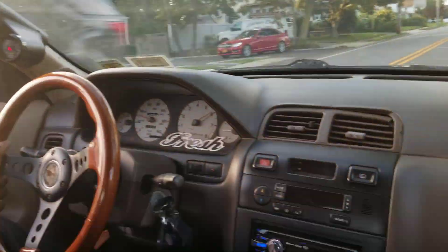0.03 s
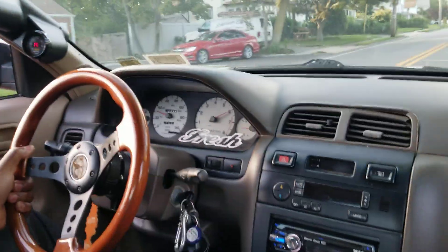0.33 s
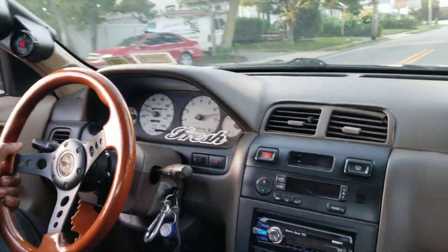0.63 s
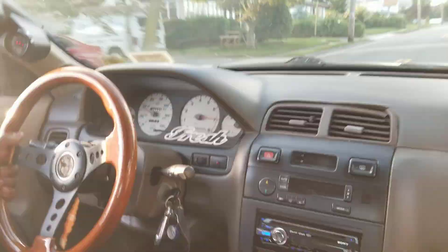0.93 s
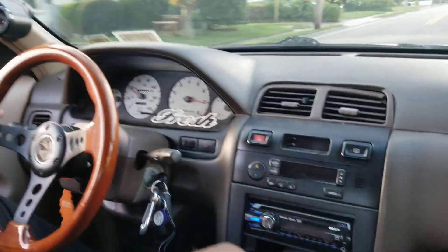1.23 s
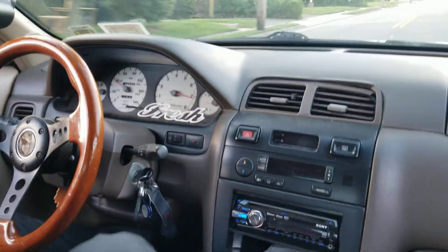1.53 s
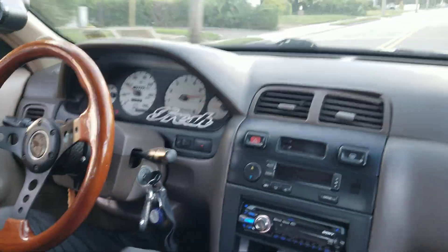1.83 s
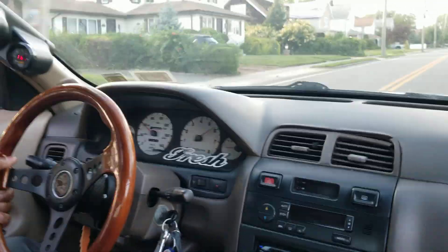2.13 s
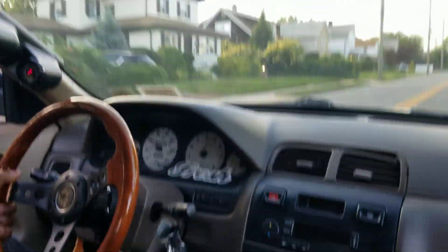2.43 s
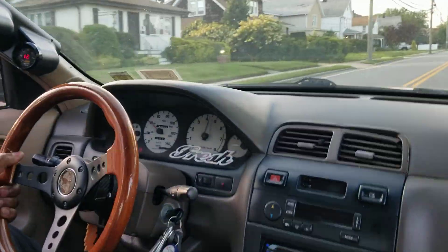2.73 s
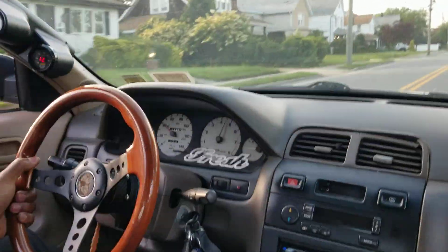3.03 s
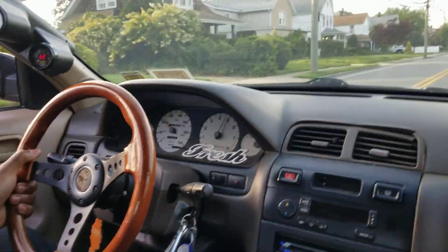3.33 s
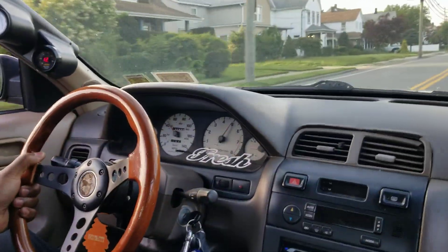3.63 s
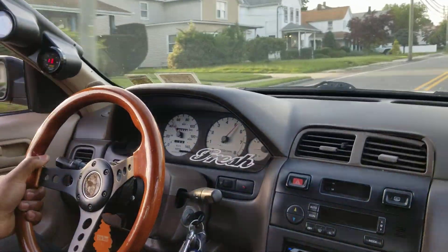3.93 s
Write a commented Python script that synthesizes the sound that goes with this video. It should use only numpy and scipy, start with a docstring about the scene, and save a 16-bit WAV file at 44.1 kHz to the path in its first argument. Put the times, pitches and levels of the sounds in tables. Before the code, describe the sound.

A car engine, heard from inside the cabin, pulls hard with a rough rumble, thumps and a loud hiss. From about 0.9 to 1.4 seconds it stutters through misfires and pops. The hiss fades and the revs sink for a gear change around 2 seconds. A lower, smoother drone then climbs slowly over road noise, joined from about 3.5 seconds by a faint, high, rising turbo whistle.

```python
"""Inside a turbocharged six-cylinder car.

The engine pulls hard and unevenly under a loud hiss of gas, stumbles in a run of misfires, and sinks
as the throttle closes. After a gear change it drones smoothly upward over road noise while the turbo
begins to whistle. Periodic firing gives the note; irregular pulses ring the exhaust and the cabin."""
import sys
import numpy as np
from scipy import signal
from scipy.fft import rfft, irfft
from scipy.io import wavfile

SR = 44100
rng = np.random.default_rng(int(sys.argv[2]) if len(sys.argv) > 2 else 0)


def file_out(sig):
    """Save sig as 16-bit WAV at sys.argv[1]."""
    # one column per channel
    cols = np.atleast_2d(sig).T
    # limit, then scale
    lim = np.clip(cols, -1, 1)
    pcm = np.round(lim * 32767).astype(np.int16)
    wavfile.write(sys.argv[1], SR, pcm)


N = 176400
T = np.arange(N) / SR
FIRINGS_PER_CYCLE = 6
RAMP_S = 0.0074  # edge of a misfire or a surge

# Misfires. Each row: start in seconds, length in seconds, change of the note in dB, thudding in dB.
MISFIRES = [(0.855,0.03,-9,-18.5),(0.999,0.038,-11.5,-17.5),(1.104,0.041,-20,-21),(1.209,0.059,-14,-24),(1.325,0.0665,-10,-38),(1.731,0.023,1,-33.5),(1.961,0.061,-0.5,-25.5)]
# Bangs as the engine catches. Each row: start in seconds, peak in dB, low edge in Hz, note surge in dB.
CATCHES = [(0.021,-8,60,3),(.08,-10,60,-0.5),(.121,-11,60,-1),(0.165,-10.5,60,2),(.367,-7,328,4.5),(.432,-9,300,-0.5),(.89,-15.5,250,2.5),(1.034,-12.5,150,-0.5),(1.272,-11,200.6,5),(1.395,-12,150,1.5),(2.012,-24,380,0)]


def pull(cycles):
    """Periodic firing in low gear makes a harmonic note that dips at misfires and surges at catches."""
    # Loudness of the note. Each row: time in seconds, level in dB.
    loudness = [(0, -20.5), (.27, -20), (.4, -18), (.65, -15), (.95, -14), (1.2, -14), (1.29, -15.5),
                (1.42, -16.5), (1.48, -21), (1.7, -20.5), (1.95, -20.5), (2.03, -31), (2.1, -104)]
    # Engine partials. Each entry: multiple of the cycle rate, relative level in dB.
    orders = {4:-32,6:0,8:-28.5,10:-37.5,12:-19,18:-27,24:-28,26:-36.5,30:-33,36:-30.5,42:-30,48:-41,54:-33,60:-41.5}
    # Resonances. Each row: centre in Hz, width in Hz, boost in dB before the throttle scales it.
    resonances = [(297, 47, 11.3), (514, 15, 14.3), (758, 86, 14)]
    # Brightness following the throttle. Each row: time in seconds, gain of the overtones in dB.
    throttle = [(0,3),(.7,0),(1.6,-6.5)]
    settle_s = 0.02
    level_db = in_time(loudness)[0] + 0.72 * drift(28)
    dips_db = sum(db * misfire_gate(start, length) for start, length, db, _ in MISFIRES)
    surge_db = sum(db * ramp(T - start) * np.exp(-np.abs(T - start) / settle_s)
                   for start, _, _, db in CATCHES)
    note = partials(cycles, orders, resonances, waver_db=4.5, waver_hz=5.1,
                    overtones_db=in_time(throttle)[0], shiver_rad=0.51)
    return from_db(level_db + dips_db + surge_db) * note


def drone(cycles):
    """In the next gear the cabin resonates at the note's octave; unequal cylinders add partials."""
    # Balance of the drone. Each row: time in seconds, then note, octave and other partials in dB.
    balance = [(1.92, -82, -57, -55), (1.98, -33.5, -27, -24), (2.1, -22, -25.5, -17),
               (2.16, -27.5, -22, -15), (2.22, -24.5, -17.5, -20.5), (2.29, -29.5, -21, -16),
               (2.5, -27, -19.5, -17.5), (3.2, -23.5, -14.5, -15), (3.42, -21.5, -13.5, -15),
               (3.76, -19.5, -15, -15), (3.86, -18, -18.5, -14.5), (4, -18, -14, -13)]
    # Engine partials. Each entry: multiple of the cycle rate, relative level in dB.
    orders = {4:-31.5,10:-26.5,14:-36,16:-41.5,18:-23,22:-44.5,24:-33.5,30:-37.5,36:-38,38:-43,40:-46.5,42:-42,44:-43.5,48:-44,60:-40}
    # Resonances. Each row: centre in Hz, width in Hz, boost in dB.
    resonances = [(295, 110, 4.4), (435, 35, 7.8), (756, 93, 11.8)]
    note_db, octave_db, others_db = in_time(balance)
    phase = firing_phase(cycles)
    note = from_db(note_db + .3 * drift(8)) * np.sin(phase)
    octave = from_db(octave_db) * np.sin(2 * phase + 2 * np.pi * rng.random())
    others = from_db(others_db) * partials(cycles, orders, resonances, waver_db=1.5, waver_hz=1.6)
    return np.sqrt(2) * (note + octave) + others


def partials(cycles, orders, resonances, waver_db, waver_hz, overtones_db=0, shiver_rad=0):
    """Forced vibration: each harmonic of the engine cycle swells as it passes through a resonance."""
    out = np.zeros((2, N))
    cycle_hz = np.gradient(cycles) * SR
    for k, (order, db) in enumerate(orders.items()):
        phase = 2 * np.pi * (order * cycles + rng.random())
        # High partials shiver in phase and differ between the sides.
        phase += shiver_rad * min(order / 42, 1) ** 2 * drift(45)
        side_phase = min(order / 36, 1) ** 2 * (-1) ** k * np.array([[.8], [-.8]])
        boost_db = sum(peak / (1 + ((order * cycle_hz - hz) * 2 / width) ** 2)
                       for hz, width, peak in resonances)
        db = db + from_db(overtones_db) * boost_db
        waver = waver_db * np.clip(-db / 30, .1, 1) * drift(waver_hz)  # weak partials waver more
        gain = from_db(db + waver + overtones_db * (order > FIRINGS_PER_CYCLE))
        out += gain * np.sqrt(2) * np.sin(phase + side_phase)
    return out


def uneven_firing(cycles):
    """Uneven firings excite resonances: a rough rumble, loudest at the start and flaring at misfires."""
    # Roughness of the firing. Each row: time in seconds, level in dB.
    roughness = [(0,-14.5),(.38,-19),(.6,-22),(.8,-58),(1.43,-24.5),(1.6,-35),(2.6,-47),(4,-40)]
    firing_count = np.floor(FIRINGS_PER_CYCLE * cycles + .07 * drift(90))
    fired = np.diff(firing_count, prepend=0) > 0
    strength = rng.choice([-1, 1], N) * rng.uniform(0.28, 1, N)
    thudding = sum(from_db(db) * misfire_gate(start, length) for start, length, _, db in MISFIRES)
    return (from_db(in_time(roughness)[0]) + thudding) * rms_one(boom(fired * strength))


def catches(bark_db=-28, bark_band_hz=(660, 1070), bark_decay_s=0.033):
    """Impulse response: one strong pulse thumps as the engine refires, with a decaying bark of gas."""
    thumps, pulses = np.zeros(N), np.zeros(N)
    for start, db, low_hz, _ in CATCHES:
        at = int(start * SR)
        thump = boom(butter(signal.unit_impulse(SR // 2), low_hz, "high"))
        thumps[at:at + len(thump)] += from_db(db) * thump / np.abs(thump).max()
        pulses[at] = from_db(db)
    gas = rms_one(butter(rng.standard_normal(N), bark_band_hz, "band"))
    decay = signal.lfilter([1], [1, -np.exp(-1 / (bark_decay_s * SR))], pulses + 1e-18)
    return thumps + from_db(bark_db) * decay * gas


def boom(pulses, low_hz=45, high_hz=1190):
    """Pressure pulses ring the modes of the exhaust and the cabin, each a damped resonator."""
    # Exhaust and cabin modes. Each row: centre in Hz, width in Hz, gain in dB.
    modes = [(55, 54, -4.5), (107, 25.3, 5), (165.2, 52, 3), (218, 52, 2.5), (293, 40, -6), (352.7, 40, -9),
             (556, 17, -14), (753, 35, -16.5), (1070, 62, -34.5)]
    out = 0
    for k, (hz, width, db) in enumerate(modes):
        radius = np.exp(-np.pi * width / SR)
        feedback = [1, -2 * radius * np.cos(2 * np.pi * hz / SR), radius ** 2]
        ring = (1 - radius ** 2) / 2 * signal.lfilter([1, 0, -1], feedback, pulses + 1e-18)
        out += (-1) ** k * from_db(db) * ring
    return butter(butter(out, low_hz, "high"), high_hz, "low")


def hiss(cycles, throb=0.09, flutter_db=1.5):
    """Turbulent gas rushes out under load, modulated by the firings and rasping in a resonance."""
    # Spectrum of the rush. Each row: frequency in Hz, left and right relative density in dB.
    spectrum = [(200, -73, -71), (505, -68, -63), (870, -65, -66.5), (1270, -80, -78), (1700, -75.5, -74),
                (2100, -75.5, -70), (2650, -70.5, -69.5), (3600, -74.5, -79), (4700, -70.5, -79),
                (6100, -78, -86), (7770, -92, -86), (8650, -89, -74), (10300, -84, -73),
                (12600, -82.5, -69.5), (14100, -84, -85), (16000, -83, -84)]
    # Loudness of the rush. Each row: time in seconds, gain in dB.
    loudness = [(0, -2), (.04, 6.5), (.07, 1), (.095, 10.5), (.115, -1), (.135, 6), (.16, 0), (.23, -0.5),
                (.28, -3.5), (.7, -4.5), (1.0, -3.5), (1.23, -4), (1.27, -8), (1.31, -2.5), (1.39, -11.5),
                (1.45, -4), (1.6, -26.5), (2.2, -49)]
    # Wandering resonance. Each row: time in seconds, centre in Hz, level in dB.
    rasp_path = [(0,2400,-33),(.15,2450,-35),(.26,2204,-47.5),(.65,2200,-39.5),(1,2150,-39.5),(1.23,2603,-38.5),(1.38,2295,-45.5),(1.44,2277,-41),(1.65,2250,-74)]
    rush = from_db(in_time(loudness)[0] + flutter_db * drift(40)) * stereo_noise(spectrum)
    rasp_hz, rasp_db = in_time(rasp_path)
    rasp_gain = from_db(rasp_db + 2.45 * drift(30))
    rasp = rasp_gain * breathy(rasp_hz * (1 + .03 * drift(14)), width_hz=350, pan_db=-3.5)
    # The hiss briefly turns brighter.
    swell_gain = from_db(-44.5) * bump(centre_s=0.767, half_width_s=0.074)
    swell = swell_gain * breathy(hz=4370, width_hz=540, pan_db=2.5)
    return (1 + throb * np.sin(firing_phase(cycles))) * (rush + rasp + swell)


def road(cycles, throb=0.11, crossover_hz=1240):
    """Broadband noise: tyres rumble below, and the engine bay rushes above, modulated by the firings."""
    # Road and engine-bay spectrum. Each row: frequency in Hz, left and right relative density in dB.
    spectrum = [(20, -73.5, -73.5), (54, -57, -58), (108, -61.5, -62), (276, -65, -63), (537, -74.5, -83.5),
                (725, -69, -75), (960, -79, -82.5), (1300, -84.5, -85), (1880, -83.5, -80.5),
                (2030, -88, -76.5), (2560, -89, -84.5), (3430, -96, -99), (4760, -93, -99),
                (6040, -102, -107), (7700, -114, -109), (8800, -110, -99.5), (12200, -109, -96),
                (14000, -110, -104), (16000, -108, -115)]
    # Loudness of the two bands. Each row: time in seconds, bass gain in dB, treble gain in dB.
    loudness = [(0, 8, 15.5), (1.6, -7.5, 3.5), (1.9, -10.5, 1), (2.3, -2.5, 1), (2.8, 1, 0),
                (3.4, -0.5, 3.5), (3.65, 1.5, 3), (3.78, 3, 6), (3.87, 5.5, 8), (4, -3, 6.5)]
    bass_db, treble_db = in_time(loudness)
    noise = stereo_noise(spectrum)
    bass = signal.sosfiltfilt(signal.butter(2, crossover_hz, fs=SR, output="sos"), noise)
    treble = (1 + throb * np.sin(firing_phase(cycles))) * (noise - bass)
    return from_db(bass_db) * bass + from_db(treble_db + 0.58 * drift(17)) * treble


def turbo():
    """A narrow band of noise whistles, its pitch climbing with rotor speed as the turbo spools up."""
    # Whistle. Each row: time in seconds, pitch in Hz, level in dB.
    whistle_path = [(3.35,8595,-83),(3.74,10750,-63),(3.88,11440,-55.5),(4,12450,-57)]
    hz, db = in_time(whistle_path)
    return from_db(db) * breathy(hz, width_hz=170, pan_db=-6.5, breath=0.73, breath_hz=800)


def squeak():
    """The trim vibrates briefly at a single frequency, giving a small, pure squeak."""
    # Trim squeak. Each row: centre in seconds, half-width in seconds, pitch in Hz, peak in dB.
    squeaks = [(2.282,0.012,1645,-41)]
    return sum(from_db(db) * bump(centre, half_width) * np.sin(2 * np.pi * hz * T)
               for centre, half_width, hz, db in squeaks)


def breathy(hz, width_hz, pan_db, breath=0, breath_hz=1000):
    """Gas in a resonance gives narrow-band noise, a randomly modulated tone; breath widens its skirts."""
    phase = 2 * np.pi * np.cumsum(hz * np.ones(N)) / SR
    sides = [sum((drift(width_hz) + breath * drift(breath_hz)) * wave(phase) for wave in (np.sin, np.cos))
             for _ in range(2)]
    return np.array(sides) * from_db([[pan_db], [-pan_db]])


def stereo_noise(spectrum, coherent_below_hz=710):
    """Noise with a colour for each side, coherent in the bass and independent in the treble."""
    hz = np.maximum(np.arange(N // 2 + 1) * SR / N, 1)
    points_hz, *sides_db = np.transpose(spectrum)
    shared, *own = rfft(rng.standard_normal((3, N)))
    coherence = from_db(-.1) / (1 + (hz / coherent_below_hz) ** 4)
    white = np.sqrt(coherence) * shared + np.sqrt(1 - coherence) * np.array(own)
    gain = from_db([np.interp(np.log(hz), np.log(points_hz), db) for db in sides_db])
    return irfft(gain * white, N) * np.sqrt(SR / 2)


def firing_phase(cycles):
    """Phase in radians, one turn to a firing."""
    return 2 * np.pi * FIRINGS_PER_CYCLE * cycles


def misfire_gate(start, length):
    """A window of 1 during a misfire, with sloping edges."""
    return ramp(np.minimum(T - start, start + length - T))


def ramp(seconds):
    """A short linear rise from 0 to 1, centred on time zero."""
    return np.clip(seconds / RAMP_S + .5, 0, 1)


def bump(centre_s, half_width_s):
    """A Gaussian envelope of peak 1."""
    return np.exp(-((T - centre_s) / half_width_s) ** 2)


def drift(rate_hz):
    """Random fluctuation of rms 1, mostly slower than the given rate."""
    hz = np.arange(N // 2 + 1) * SR / N
    return rms_one(irfft(rfft(rng.standard_normal(N)) / (1 + (hz / rate_hz) ** 2), N))


def butter(x, hz, kind):
    """A low-, high- or band-pass with second-order slopes."""
    return signal.sosfilt(signal.butter(2, hz, kind, fs=SR, output="sos"), x)


def in_time(rows):
    """Each column after the time column, interpolated to every sample."""
    seconds, *columns = np.transpose(rows)
    return [np.interp(T, seconds, column) for column in columns]


def from_db(db):
    """Decibels to amplitude ratio."""
    return 10 ** (np.asarray(db) / 20)


def rms_one(x):
    """Scale to rms 1."""
    return x / np.sqrt(np.mean(x ** 2) + 1e-20)


def scene(right_lag_s=0.0001):
    """Superposition: one crankshaft times the firing layers; the engine reaches the right side later."""
    # Engine speed in the low gear, then in the next. Each row: time in seconds, firing rate in Hz.
    low_gear = [(0, 136.6), (.2, 140.9), (.3, 144.3), (.4, 152), (.55, 154.6), (.8, 170.4), (1.0, 172.1),
                (1.25, 173), (1.47, 176.1), (1.56, 167.2), (1.7, 157.2), (1.78, 148.2), (1.93, 139.5)]
    next_gear = [(1.98, 136.8), (2.1, 135.3), (2.18, 124.3), (2.3, 103.5), (2.36, 102.7), (2.82, 111.1),
                 (2.85, 110.3), (3.04, 114), (3.13, 113.3), (3.23, 116.9), (3.38, 117.1), (3.43, 120.9),
                 (3.74, 124.8), (3.88, 131.8), (3.92, 126), (4.0, 123.8)]
    firing_hz = in_time([*low_gear, *next_gear])[0] * (1 + .002 * drift(15))
    cycles = np.cumsum(firing_hz) / SR / FIRINGS_PER_CYCLE
    left, right = pull(cycles) + drone(cycles) + uneven_firing(cycles) + catches()
    engine = np.array([left, np.interp(T - right_lag_s, T, right)])
    return engine + hiss(cycles) + road(cycles) + turbo() + squeak()


def record(dry):
    """Band limiting: a steep elliptic low-pass cuts the highest treble."""
    cutoff_hz = 15850
    return signal.sosfilt(signal.ellip(12, .1, 90, cutoff_hz, fs=SR, output="sos"), dry)


dry = scene()
out = record(dry)
file_out(out)
```